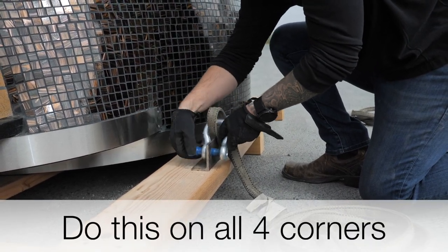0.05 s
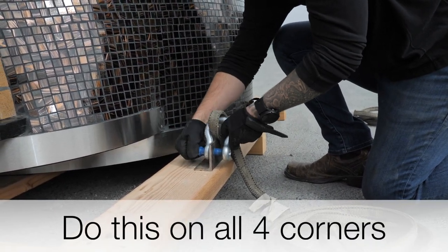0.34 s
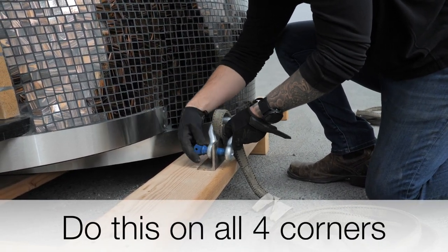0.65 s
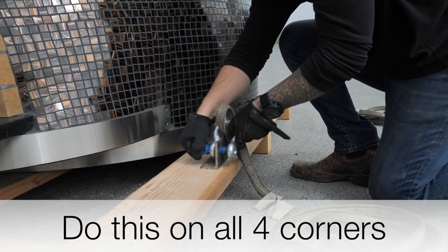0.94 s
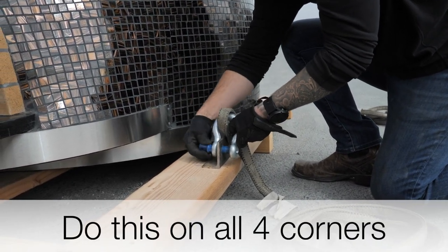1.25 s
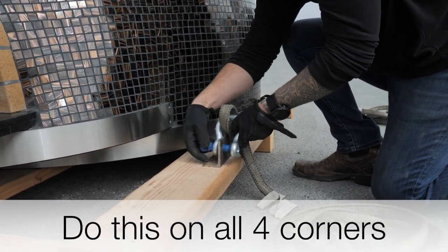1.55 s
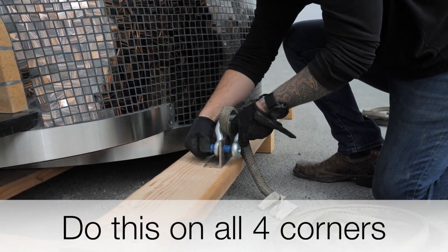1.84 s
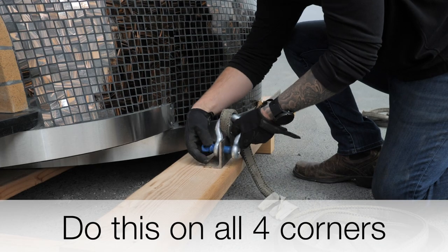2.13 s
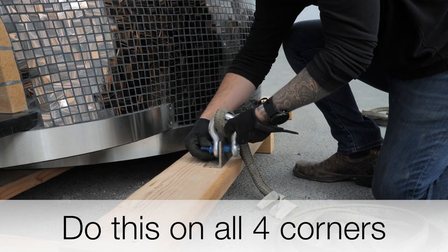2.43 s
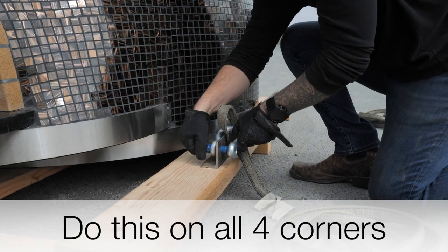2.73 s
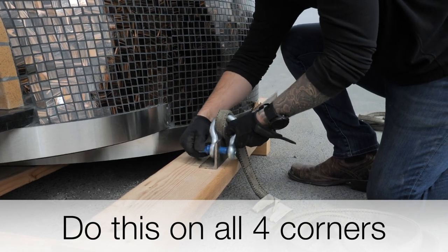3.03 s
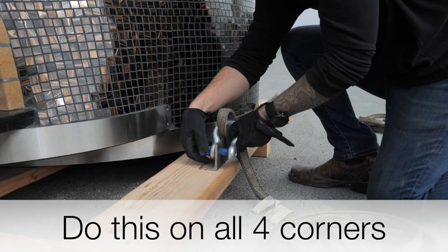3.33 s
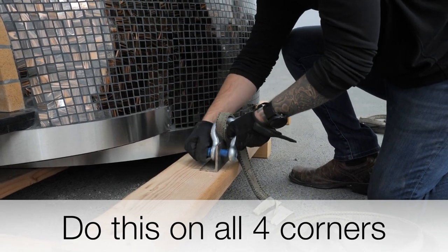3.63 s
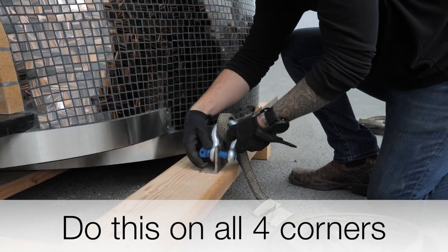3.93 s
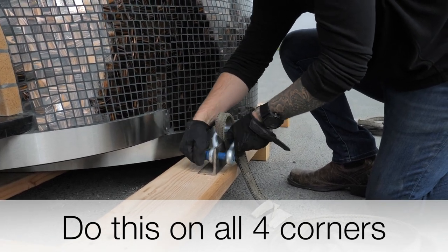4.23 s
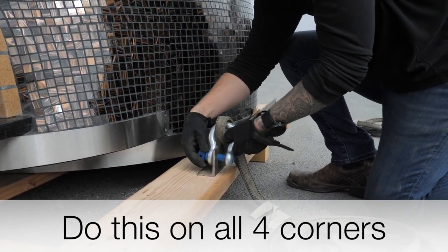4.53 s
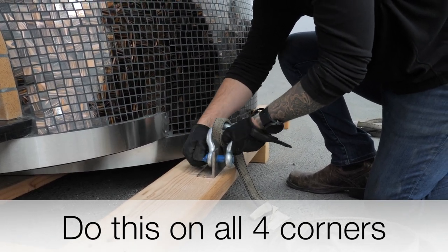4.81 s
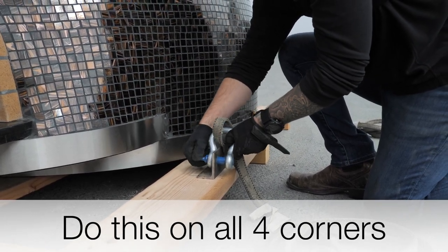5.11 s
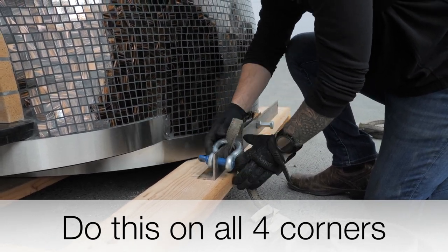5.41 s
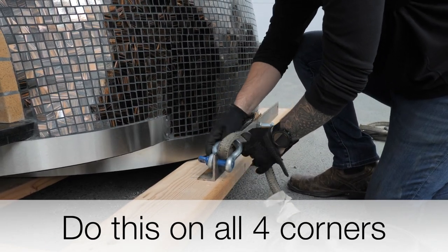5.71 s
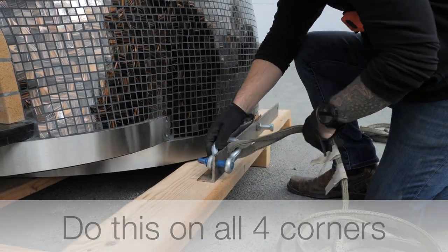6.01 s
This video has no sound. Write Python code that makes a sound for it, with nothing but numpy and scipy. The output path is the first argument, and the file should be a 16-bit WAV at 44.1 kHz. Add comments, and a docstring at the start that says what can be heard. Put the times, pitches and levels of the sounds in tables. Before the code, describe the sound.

A steel pin grinds and ticks as it is screwed into a shackle, with a few clanks, then wind buffets the microphone.

```python
"""Pinning a shackle outdoors

Close to one microphone in a yard, a steel shackle is pinned by hand to a lifting bracket on a
timber beam. The screw pin grinds round in short slips and the bow clanks against the bracket,
damped by the gloves. Then a webbing sling is drawn tight while a gust buffets the microphone."""
import sys
import numpy as np
from scipy import signal
from scipy.fft import rfft, irfft, next_fast_len
from scipy.io import wavfile
from scipy.ndimage import uniform_filter1d, map_coordinates

SR = 44100
rng = np.random.default_rng(int(sys.argv[2]) if len(sys.argv) > 2 else 0)


def wrap_up_sound(samples):
    """Save the sound to the file named by the first command line argument, as 16-bit audio."""
    columns = np.atleast_2d(samples).T
    # keep every value between -1 and 1, then stretch to whole-number steps
    tamed = np.clip(columns, -1, 1)
    steps = np.round(tamed * 32767).astype(np.int16)
    wavfile.write(sys.argv[1], SR, steps)


N = 276066
RING = SR // 5  # samples that a contact may ring


def amp(db):
    return 10 ** (np.asarray(db) / 20)


def unit(x):
    return x / np.sqrt(np.mean(x ** 2) + 1e-20)


def gain_at(spectrum, hz):
    """Gain of (f/Hz, level/dB) points, read on a log frequency axis."""
    f, db = np.transpose(spectrum)
    return amp(np.interp(np.log(hz + 1), np.log(f + 1), db))


def fader(points):
    """Gain for each sample, through (t/s, level/dB) points."""
    return amp(np.interp(np.arange(N) / SR, *np.transpose(points)))


def wobble(rate):
    """A smooth random curve, rate knots a second."""
    knots = rng.standard_normal(int(N * rate / SR) + 4)
    return map_coordinates(knots, [np.arange(N) * rate / SR])


def filtered(x, response):
    """x shaped by a gain that depends on frequency."""
    size = next_fast_len(len(x) + RING)
    return irfft(rfft(x, size) * response(np.fft.rfftfreq(size, 1 / SR)), size)[:len(x)]


def noise(spectrum, size):
    """Coloured noise of rms 1."""
    return unit(filtered(rng.standard_normal(size), lambda hz: gain_at(spectrum, hz)))


def add(track, s, sound):
    """Lay a sound into the track at time s."""
    start = max(0, round(s * SR))
    track[start:start + len(sound)] += sound[:len(track) - start]


def swell(t, length, attack_s, release_s):
    """A gain that rises from t = 0, holds until length and dies away."""
    return np.clip(t / attack_s, 0, 1) * np.exp(-np.maximum(t - length, 0) / release_s)


def swells(rows, attack_s, release_s):
    """Gain over the whole scene for (t/s, length/s, level/dB) rows."""
    t = np.arange(N) / SR
    return np.max([amp(db) * swell(t - s, length, attack_s, release_s) for s, length, db in rows], 0)


# the yard in the distance: f/Hz, relative level/dB
YARD_SPECTRUM = [(25, -12), (90, 4), (160, 4.5), (260, 0.5), (400, -11), (700, -9), (1100, -14),
                 (1800, -21.5), (4000, -31), (8000, -35), (11000, -41), (15500, -44)]
def yard():
    """A steady, low wash of noise far behind the work."""
    return amp(-55.5) * noise(YARD_SPECTRUM, N)


# light air at the microphone: t/s, level/dB
BREEZE = [(0, -39.5), (0.8, -43), (1.45, -49), (2.2, -74.5), (4.0, -67), (4.4, -45.5), (4.52, -34.5),
          (5.05, -47), (5.9, -21), (6.25, -18)]
# gusts on top of it: t/s, length/s, level/dB
GUSTS = [(4.585, 0.05, -19.5), (4.70, 0.089, -22), (4.83, 0.019, -26.5), (4.88, 0.032, -25),
         (5.146, 0.026, -11), (5.18, 0.13, -11.5), (5.33, 0.15, -14), (5.48, 0.067, -10),
         (5.575, 0.23, -15), (5.83, 0.092, -19), (6.0, 0.022, -15), (6.12, 0.087, -18.5),
         (6.235, 0.018, -13)]
# the rumble of a full gust: f/Hz, relative level/dB
BUFFET_SPECTRUM = [(15, -15), (35, -7.5), (70, 4), (115, 3), (170, -3.5), (250, -12), (400, -26.5),
                   (600, -42), (1000, -63), (2000, -82), (6000, -110)]
def wind(full_gust_db=-14, db_per_octave=30):
    """Eddies hit the microphone: faster air is louder and makes smaller, higher eddies."""
    level_db = 20 * np.log10(fader(BREEZE) + swells(GUSTS, attack_s=0.014, release_s=0.017))
    hz, frame_s, white = signal.stft(rng.standard_normal(N), SR, nperseg=2048)
    frame_db = np.interp(frame_s, np.arange(N) / SR, level_db)
    speed = 2 ** ((frame_db - full_gust_db) / db_per_octave)
    shaped = white * gain_at(BUFFET_SPECTRUM, hz[:, None] / speed)
    eddies = signal.istft(shaped, SR, nperseg=2048)[1][:N]
    power = uniform_filter1d(uniform_filter1d(eddies ** 2, size=2400), size=2400)
    lumps_db = np.interp(level_db, [-35, -20], [4, 1]) * wobble(30)  # light air is lumpier
    return amp(level_db + lumps_db) * eddies / np.sqrt(np.abs(power))


# single buffets on the microphone: t/s, level/dB, f/Hz
PUFFS = [(0.26, -25.5, 52), (5.162, 1.5, 88), (5.293, 0.5, 117), (5.538, -0.5, 126)]
def puffs():
    """One large eddy passes: a push, a deep suck and a push again."""
    out = np.zeros(N)
    t = (np.arange(RING) - RING // 2) / SR
    for s, db, hz in PUFFS:
        u = (np.pi * hz * t) ** 2
        add(out, s + t[0], amp(db) * (2 * u - 1) * np.exp(-u))
    return out


# thin crackles in the strongest wind: t/s, peak level/dB
CRACKLES = [(5.16, -36.5), (5.1642, -32.5), (5.289, -38.5), (5.295, -44.5), (5.526, -41), (5.5393, -30),
            (5.542, -35.5), (5.546, -34.5), (5.585, -44), (5.609, -47.5), (5.644, -41.5)]
def crackles(corner_hz=2100):
    """Tiny dry clicks with no ring: the microphone crackles as the strongest gusts overload it."""
    out = np.zeros(N)
    u = 2 * np.pi * corner_hz * np.arange(RING // 10) / SR
    for s, db in CRACKLES:
        add(out, s, amp(db) * u * np.exp(1 - u))
    return out


# cloth rubbing close by: f/Hz, relative level/dB
CLOTH_SPECTRUM = [(400, -8), (1500, -1), (3000, -0.5), (4800, 2), (5700, -4.5), (6900, -2.5), (8000, -9),
                  (9200, -8), (10300, -16), (15500, -25.5)]
# the sling drawn tight: t/s, level/dB
SLING_PULL = [(5.1, -100), (5.23, -67.5), (5.5, -68), (5.58, -78.5), (5.78, -68.5), (6.01, -62),
              (6.22, -67.5)]
# turns of the pin, shared with grinding(): t/s, length/s, relative grind/dB, relative rustle/dB
TURNS = [(0.04, 0.11, -49, -67.5), (0.29, .13, -41.5, -62.5), (0.511, 0.11, -45.5, -64.5),
         (0.755, 0.14, -41, -65), (1.054, 0.067, -44, -67), (1.22, 0.14, -40.5, -66.5),
         (1.526, 0.047, -42, -66), (1.749, 0.044, -38, -68), (1.907, 0.025, -43, -69.5),
         (2.067, 0.037, -42.5, -64), (2.413, 0.23, -39, -67.5), (2.749, 0.12, -49.5, -71),
         (2.981, 0.28, -42.5, -72), (3.282, 0.31, -46.5, -70), (3.575, 0.06, -42, -69),
         (3.683, 0.04, -42.5, -70), (3.84, 0.093, -42.5, -66.5), (4.046, 0.075, -45, -70.5),
         (4.193, 0.13, -40.5, -69.5), (4.42, 0.15, -47, -69), (4.637, 0.13, -50.5, -80.5)]
TURN_ATTACK_S, TURN_RELEASE_S = 0.0096, 0.043  # the grip takes hold and lets go
def gloves_and_sling(rest_db=-76.5):
    """Gloves rustle with each turn and shift faintly in between; then the webbing slides."""
    turns = [(s, length, db - 5) for s, length, _, db in TURNS]
    gloves = swells(turns, TURN_ATTACK_S, TURN_RELEASE_S) + amp(rest_db)
    turning = np.arange(N) / SR < SLING_PULL[0][0]
    gain = np.where(turning, gloves, fader(SLING_PULL))
    cloth = noise(CLOTH_SPECTRUM, N)
    grain_db = wobble(140)
    crease_db = 1.5 * turning * wobble(23)
    return gain * unit(cloth * amp(grain_db + crease_db))


def ring(modes, scatter_db, detune=0):
    """Damped modes, neighbours in opposite phase; each contact point shares the energy out anew."""
    t = np.arange(RING) / SR
    hz, db, t60 = np.transpose(modes)[:, :, None]
    strength = amp(db + scatter_db * rng.standard_normal(hz.shape)) / t60
    hz = hz * (1 + detune * rng.standard_normal(hz.shape))
    sign = (-1) ** np.arange(len(modes))[:, None]
    return np.sum(sign * strength * amp(-60 * t / t60) * np.sin(2 * np.pi * hz * t), axis=0)


def soften(x, top_hz, low_hz=380):
    """A light contact reaches neither the highest modes nor the heavy beam."""
    lowpass = signal.butter(2, np.clip(top_hz, 200, SR / 3), fs=SR, output="sos")
    highpass = signal.butter(2, low_hz, "high", fs=SR, output="sos")
    return signal.sosfilt(np.vstack([lowpass, highpass]), x)


def brighten(x, treble_db, corner_hz):
    """A treble shelf: harder contacts reach the higher modes."""
    low = signal.sosfilt(signal.butter(2, corner_hz, fs=SR, output="sos"), x)
    high = signal.sosfilt(signal.butter(2, corner_hz, "high", fs=SR, output="sos"), x)
    return low - amp(treble_db) * high


# the bracket on its beam: f/Hz, relative resonance level/dB, t60/s
BRACKET_MODES = [(416.3, -12, 0.14), (448.7, -2, 0.033), (495.3, 2.5, 0.054), (585, 0.5, 0.091),
                 (685, -8, 0.12), (776, -23.5, 0.13), (900, -17, .05), (927.4, -12.5, 0.044),
                 (1028, -19.5, 0.1), (1130.5, -12.5, 0.077), (1272, -19.5, 0.039), (1402, -15.5, 0.052),
                 (1653, -24, 0.031), (2044, -19.5, 0.08), (2118, -29.5, 0.16), (2267, -23, 0.071),
                 (2378, -27, 0.068), (2697, -25.5, 0.029), (2820, -31.5, 0.089), (3167, -31, 0.066),
                 (3580, -36.5, 0.07), (3756, -27, 0.033), (3990, -29, 0.049), (4540, -27, 0.044),
                 (5120, -44, 0.052)]
# the bow's main ring, three overtones and two top modes: f/Hz, relative resonance level/dB, t60/s
BOW_MODES = [(4745, -12, .08), (6550, -38, .04), (6930, -42, .04), (7440, -24, .125), (9400, -50, .035),
             (11000, -49, .07)]
# dense, quickly dying resonances between the modes: f/Hz, relative level/dB
CLATTER_SPECTRUM = [(30, -16.5), (200, -24), (330, -12), (480, 0), (750, -13.5), (1400, -26.5),
                    (1800, -32.5), (2500, -28), (4000, -37), (5100, -36), (6000, -44.5), (8200, -54.5),
                    (11000, -72.5), (15500, -67.5)]
GRIP_DETUNE = 0.006  # relative spread of the bracket's mode frequencies from grip to grip
def steel(bow_db, overtones_db, top_db, scatter_db, clatter_db, clatter_t60,
          chatter_s=0.0017, bow_hz=BOW_MODES[0][0], rise_s=0.00052):
    """One contact: bow and bracket ring, their faces chatter and the yard scatters a faint tail."""
    t = np.arange(RING) / SR
    clatter_fade = amp(clatter_db - 60 * np.maximum(t - chatter_s, 0) / clatter_t60)
    yard_tail = amp(-9 - 60 * t / 0.38)
    main = ring([(bow_hz, *BOW_MODES[0][1:])], scatter_db=4)
    overtones = amp(overtones_db) * ring(BOW_MODES[1:4], scatter_db=1)
    top = amp(top_db) * ring(BOW_MODES[4:], scatter_db=3)
    bracket = ring(BRACKET_MODES, scatter_db, GRIP_DETUNE)
    clatter = (clatter_fade + yard_tail) * noise(CLATTER_SPECTRUM, RING)
    sound = bracket + amp(bow_db) * (main + overtones) + top + clatter
    return sound * (1 - np.exp(-t / rise_s))


def grinding(grains_per_s=1100, clatter_t60=0.061, top_hz=1120, gain_db=0.57):
    """The thread catches grain by grain and shakes the bracket, from a new point on every turn."""
    out = np.zeros(N)
    t = np.arange(2 * RING) / SR
    grit = rng.random(N) < grains_per_s / SR
    force = rng.standard_normal(N) * grit * amp(2.5 * wobble(90))
    for s, length, db, _ in TURNS:
        bracket = ring(BRACKET_MODES, scatter_db=5, detune=GRIP_DETUNE)
        clatter = noise(CLATTER_SPECTRUM, RING) * amp(28 - 60 * t[:RING] / clatter_t60)
        rub = signal.fftconvolve(force[round(s * SR):][:len(t)], bracket + clatter)[:len(t)]
        grip = swell(t, length, TURN_ATTACK_S, TURN_RELEASE_S)
        add(out, s, amp(db + gain_db) * grip * unit(soften(rub, top_hz)))
    rest_gain = amp(-60 + 4.7 * wobble(14))  # the held shackle keeps rubbing faintly
    return out + rest_gain * unit(soften(noise(CLATTER_SPECTRUM, N), top_hz))


# the dry thread squeaks: t/s, level/dB, f/Hz
SQUEAKS = [(0.852, -38.5, 1170), (0.89, -46, 2135), (1.32, -38.5, 1173), (1.814, -44, 1170),
           (3.1, -39.5, 1120), (3.719, -37.5, 1160)]
def squeaks(width_s=0.0065, waver=0.072):
    """Stick and slip lock onto one mode of the bracket for a moment: a short, wavering tone."""
    out = np.zeros(N)
    t = (np.arange(RING) - RING // 2) / SR
    envelope = np.exp(-(t / width_s) ** 2)
    for s, db, hz in SQUEAKS:
        drift = unit(uniform_filter1d(rng.standard_normal(RING), size=100))
        phase = 2 * np.pi * np.cumsum(hz * (1 + waver * drift)) / SR
        add(out, s + t[0], amp(db) * envelope * np.sin(phase))
    return out


# taps of the loose pin: t/s, level/dB, upper edge/Hz, lower edge/Hz
PIN_TAPS = [(0.072, -31, 1170, 378), (0.178, -34.5, 1480, 380), (0.764, -37, 2180, 500),
            (0.927, -38, 3060, 600), (1.036, -40, 1850, 850), (1.068, -37.5, 1180, 450),
            (1.161, -36.5, 680, 380), (1.232, -43, 1900, 450), (1.381, -28.5, 1810, 450),
            (1.612, -31.5, 1940, 380), (2.136, -29.5, 880, 380), (3.121, -35.5, 1300, 380),
            (4.943, -36, 2430, 500)]
def taps(span_s=0.021):
    """The loose pin drops against its hole: one light contact, its level an rms over span_s."""
    out = np.zeros(N)
    for s, db, top_hz, low_hz in PIN_TAPS:
        body = steel(bow_db=-18, overtones_db=8, top_db=-4, scatter_db=2,
                     clatter_db=21, clatter_t60=0.06)
        tap = soften(body, top_hz, low_hz)
        add(out, s, amp(db) * tap * np.sqrt(span_s * SR / np.sum(tap ** 2)))
    return out


# the pin sticks and lets go with a tick: t/s, relative level/dB, length/s, treble/dB
PIN_SLIPS = [(0.076, -34.5, 0.0047, -44), (0.119, -42, 0.012, -26), (0.277, -43.5, 0.017, -19),
             (0.301, -33.5, 0.012, -27.5), (0.318, -36, 0.022, -45), (0.352, -34, 0.0057, -40),
             (0.414, -31.5, 0.0048, -37), (0.448, -41, 0.014, -22), (0.524, -35.5, 0.0024, -36),
             (0.567, -45, .007, -29), (0.616, -37.5, 0.0087, -35.5), (0.684, -37.5, 0.0061, -43),
             (0.772, -51, 0.019, -21), (0.797, -55, 0.022, 2), (0.812, -40.5, 0.012, -35),
             (0.844, -31.5, 0.0062, -48.5), (0.882, -38, 0.013, -31), (1.097, -45.5, 0.012, -7),
             (1.265, -50, 0.013, -35), (1.278, -39, 0.011, -35), (1.303, -36.5, 0.0083, -25),
             (1.389, -31, 0.011, -20.5), (1.41, -34, 0.0064, -30), (1.465, -44.5, 0.0075, -29),
             (1.523, -38.5, 0.0063, -55), (1.607, -41, 0.014, -26), (1.793, -30, 0.0096, -40),
             (1.794, -46, 0.0093, -6), (1.93, -53, 0.0073, 10), (2.031, -40.5, 0.0088, -44),
             (2.068, -41.5, 0.017, -37), (2.115, -40, 0.018, -19), (2.16, -36.5, 0.0064, -51),
             (2.362, -50, 0.037, -18), (2.402, -37, 0.005, -41), (2.424, -38.5, 0.02, -19),
             (2.468, -33.5, 0.0071, -35), (2.478, -34.5, 0.014, -26), (2.47, -45, 0.022, 0),
             (2.501, -35.5, 0.016, -28), (2.553, -44, 0.011, -28), (2.572, -32.5, 0.0042, -38),
             (2.759, -45, 0.0058, -31), (2.812, -45, 0.0062, -35), (2.871, -40.5, 0.015, -34),
             (3.012, -33.5, 0.014, -24), (3.021, -30.5, 0.018, -32), (3.058, -38, .012, -49),
             (3.089, -35, 0.0034, -46), (3.147, -46, 0.019, -4), (3.335, -45, 0.0055, -15),
             (3.351, -50, 0.036, -4), (3.419, -34.5, 0.0028, -45), (3.461, -37, 0.0074, -44),
             (3.537, -43, 0.032, -34), (3.606, -36, 0.015, -47), (3.676, -35.5, 0.0071, -31.5),
             (3.703, -41, 0.035, -22.5), (3.862, -40.5, 0.0052, -20), (3.965, -37, 0.005, -50),
             (3.981, -39.5, 0.0055, -45), (4.055, -41, 0.018, -49), (4.085, -41, 0.011, -32),
             (4.115, -38, 0.012, -62), (4.222, -43, 0.0077, -30), (4.252, -37, 0.008, -22),
             (4.269, -41, 0.013, -17), (4.446, -42.5, 0.038, -29), (4.67, -41, 0.02, -22),
             (4.69, -39, 0.02, 11), (4.727, -32.5, 0.0072, -49), (5.183, -34.5, 0.011, -49),
             (5.419, -33.5, 0.0024, -36), (5.883, -42.5, 0.037, -58.5), (6.063, -44, 0.0084, -38)]
# dry steel on steel: f/Hz, relative level/dB
SCRATCH_SPECTRUM = [(500, 9.5), (2000, -6.5), (4500, 11.5), (5800, 2.5), (6800, 11), (8000, -9.5),
                    (9500, -1), (10500, -14.5), (15500, -30)]
def slips(gain_db=-0.42, open_hz=7500, scratch_db=-18):
    """The thread lets go suddenly: a burst of tiny contacts shakes the bracket and dies away."""
    out, scratch = np.zeros(N), np.zeros(N)
    t = np.arange(RING // 2) / SR
    for s, db, length, treble_db in PIN_SLIPS:
        grains = rng.standard_normal(len(t)) * (rng.random(len(t)) < 0.08)
        grains *= amp(2.5 * rng.standard_normal(len(t)))
        u = t / (0.35 * length)
        force = grains * u * np.exp(-u ** 1.25)
        brightness = np.sqrt(amp(treble_db))  # the treble goes with the square of the corner
        body = steel(bow_db=-15, overtones_db=15, top_db=-7, scatter_db=3,
                     clatter_db=23, clatter_t60=0.045, chatter_s=0.0012, rise_s=0.00078)
        tick = soften(signal.fftconvolve(force, body), open_hz * brightness)
        level = amp(db + gain_db) * np.sqrt(length / t[-1])
        add(out, s, level * unit(tick))
        add(scratch, s, level * brightness * unit(force))
    # the tiny contacts also reach the microphone directly, as a fine scratch
    return out + amp(scratch_db) * filtered(scratch, lambda hz: gain_at(SCRATCH_SPECTRUM, hz))


# steel meets steel, close up: t/s, level/dB, treble/dB, bow ring/dB, bow f/Hz, overtones/dB,
# top modes/dB, clatter t60/s, chatter/s, rebound delay/s, rebound gain/dB
BOW_CLANKS = [(0.381, -24, 4, -35, 4640, -14, -20, 0.032, 0.0011, 0.011, 3),
              (2.638, -12.5, 8.5, -7, 4740, -8, -9, 0.046, 0.0019, 0.0085, -34),
              (3.218, -15, 12, -4, 4720, -5.5, -12, 0.02, 0.0012, .010, -11),
              (4.301, -13.5, 9.5, -10, 4710, -14, -3, 0.041, 0.0038, 0.0095, -26),
              (4.699, -25.5, -16, -11, 4900, -13, -3, 0.072, 0.0019, 0.0051, -28),
              (5.3279, -18, 11.5, -23, 4630, 6, -1, 0.039, 0.0029, 0.012, -17)]
def clanks(span_s=0.013):
    """The bow strikes the bracket and falls back once, duller; the level is an rms over span_s."""
    out = np.zeros(N)
    for (s, db, treble_db, bow_db, bow_hz, overtones_db, top_db,
         t60, chatter_s, delay_s, rebound_db) in BOW_CLANKS:
        blow = steel(bow_db, overtones_db, top_db, scatter_db=0,
                     clatter_db=23, clatter_t60=t60, chatter_s=chatter_s, bow_hz=bow_hz)
        rebound = steel(bow_db - 6, overtones_db, top_db, scatter_db=3,
                        clatter_db=18.5, clatter_t60=t60, bow_hz=bow_hz)
        blow = brighten(blow, treble_db, corner_hz=1760)
        rebound = brighten(rebound, treble_db - 4, corner_hz=1590)
        add(blow, delay_s, amp(rebound_db) * soften(rebound, top_hz=5470, low_hz=201))
        add(out, s, amp(db) * blow * np.sqrt(span_s * SR / np.sum(blow ** 2)))
    return out


def scene():
    """Shackle and hands nearby, wind on the microphone and the yard far off, in mono."""
    work = clanks() + squeaks() + grinding() + gloves_and_sling()
    outdoors = wind() + puffs() + crackles() + yard()
    pin_ticks = slips() + taps()
    return (outdoors + work + pin_ticks)[None]


def record(dry, top_hz=15700):
    """The strongest buffets softly overload the microphone; nothing is kept above top_hz."""
    clipped = dry[0] / (1 + np.abs(dry[0]) ** 6) ** (1 / 6)
    return filtered(clipped, lambda hz: hz < top_hz)[None]


dry = scene()
out = record(dry)
wrap_up_sound(out)
```